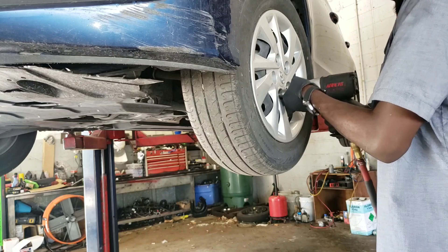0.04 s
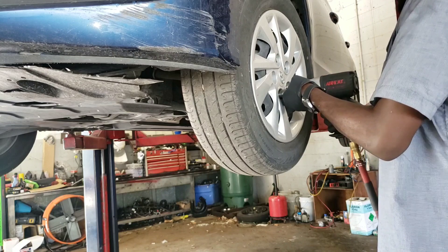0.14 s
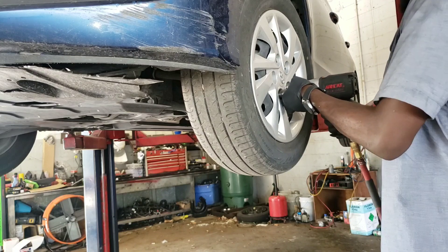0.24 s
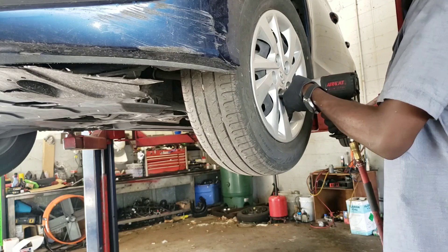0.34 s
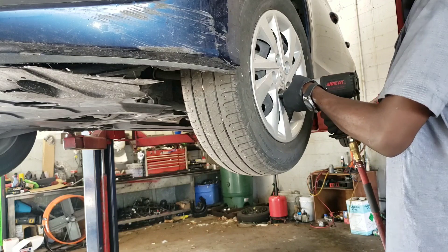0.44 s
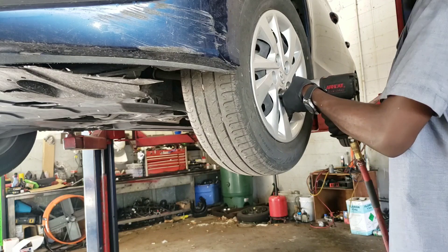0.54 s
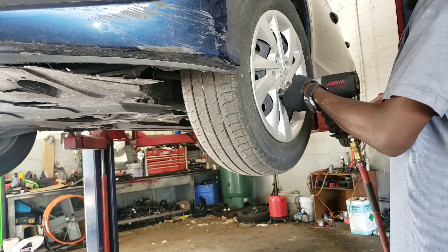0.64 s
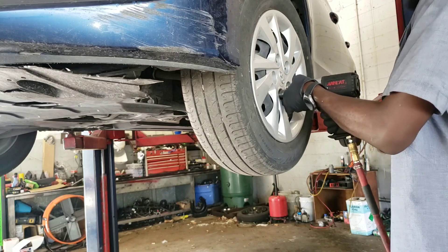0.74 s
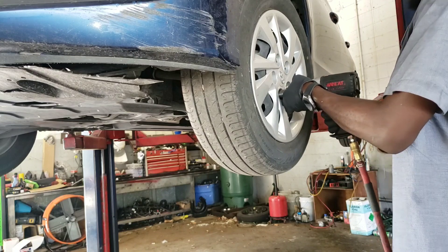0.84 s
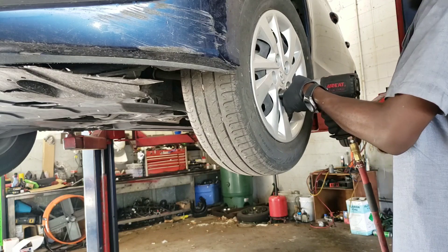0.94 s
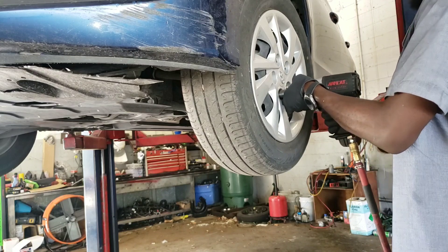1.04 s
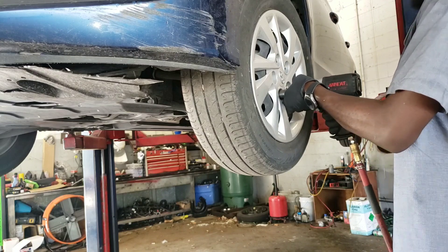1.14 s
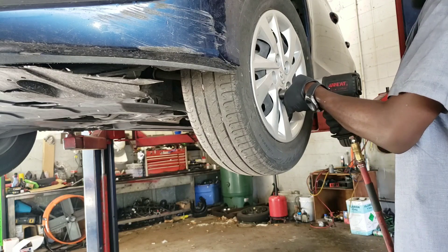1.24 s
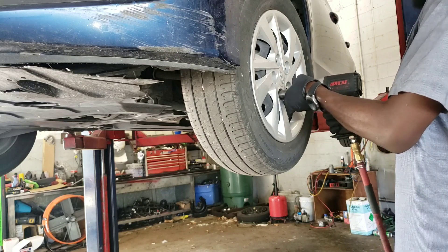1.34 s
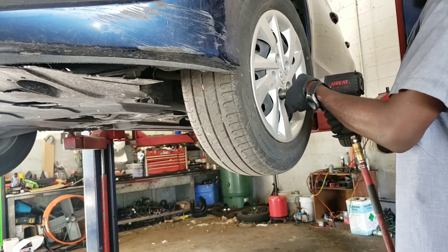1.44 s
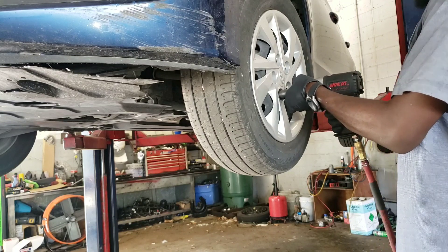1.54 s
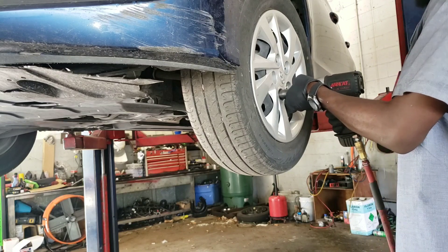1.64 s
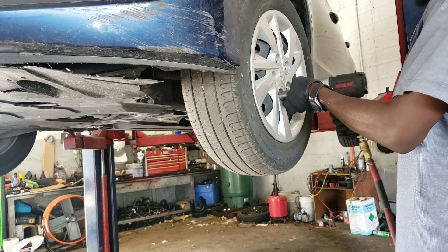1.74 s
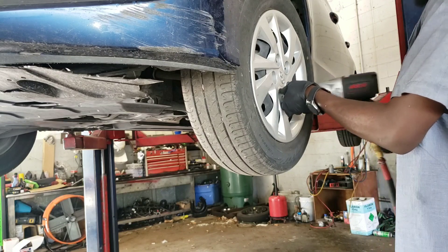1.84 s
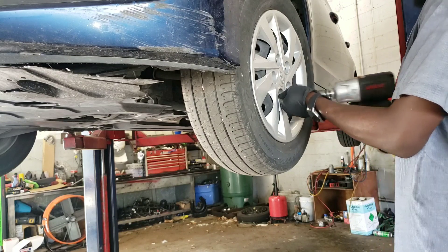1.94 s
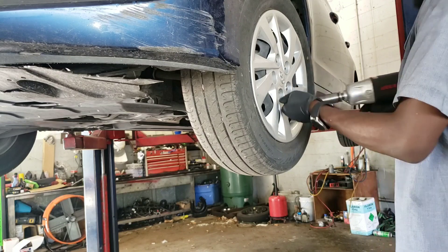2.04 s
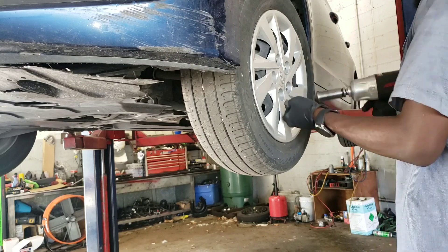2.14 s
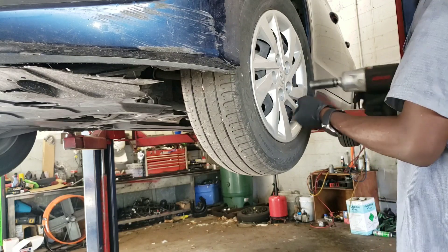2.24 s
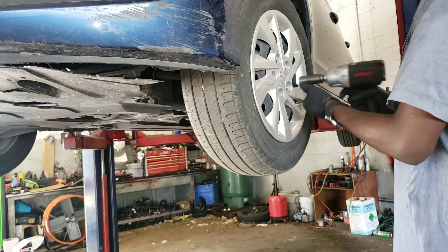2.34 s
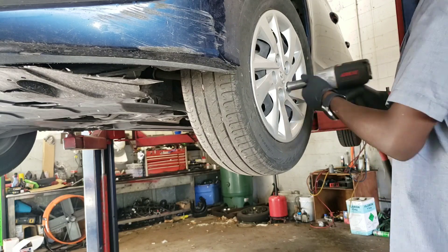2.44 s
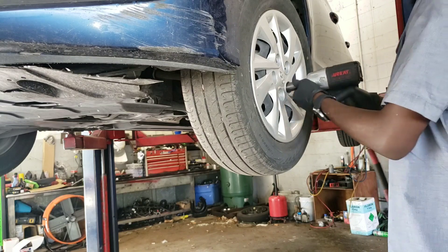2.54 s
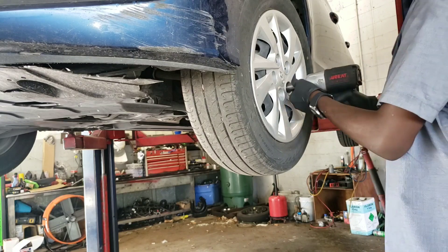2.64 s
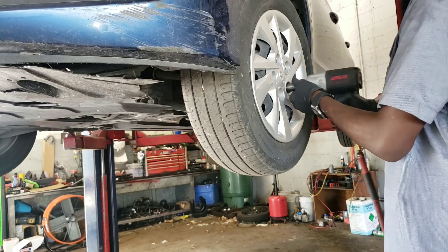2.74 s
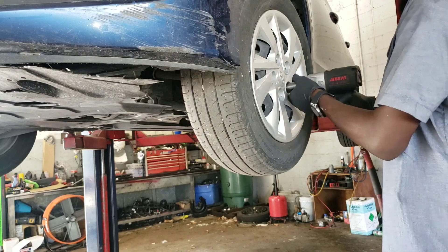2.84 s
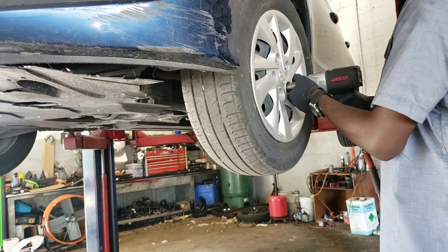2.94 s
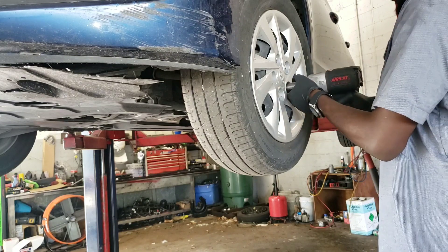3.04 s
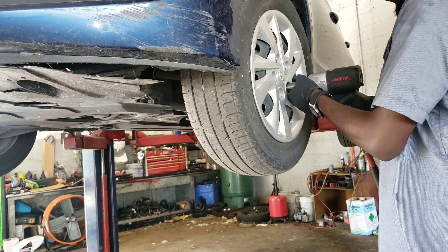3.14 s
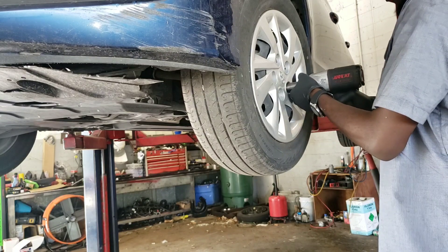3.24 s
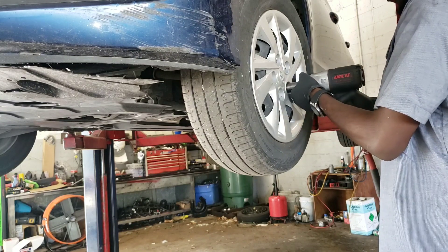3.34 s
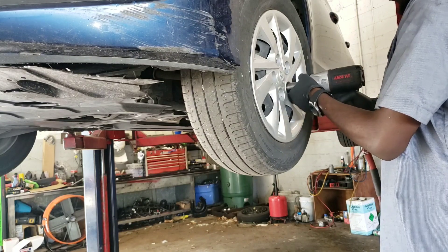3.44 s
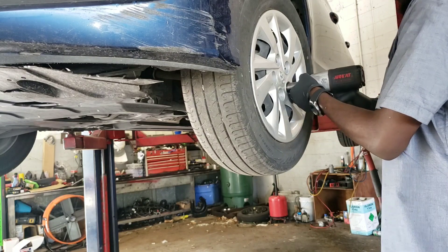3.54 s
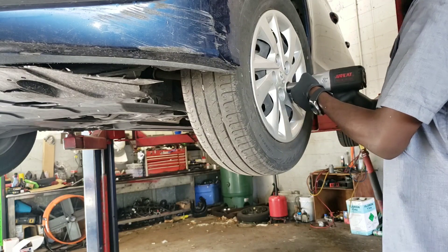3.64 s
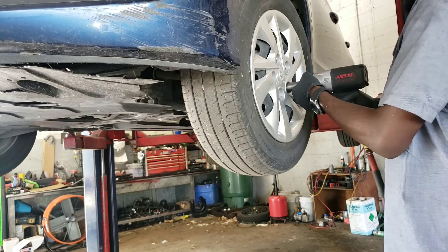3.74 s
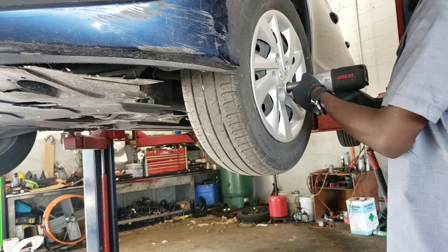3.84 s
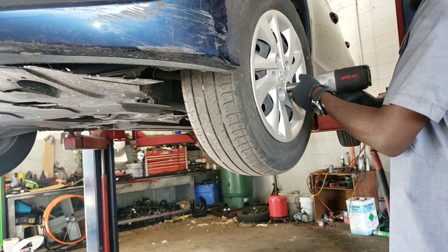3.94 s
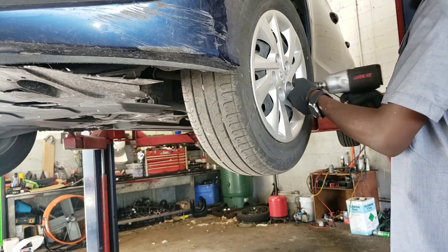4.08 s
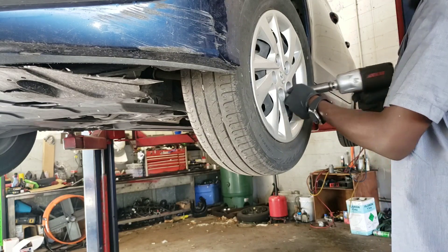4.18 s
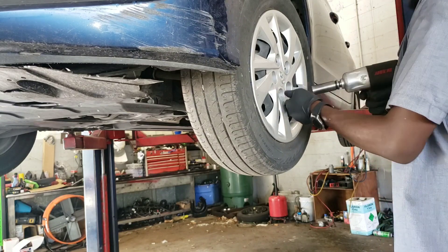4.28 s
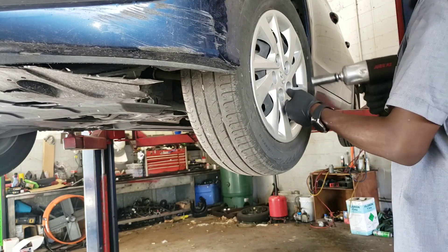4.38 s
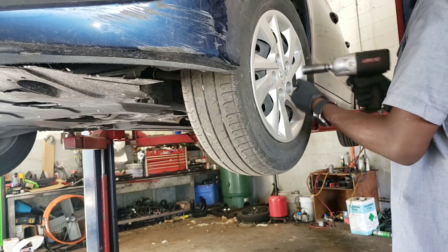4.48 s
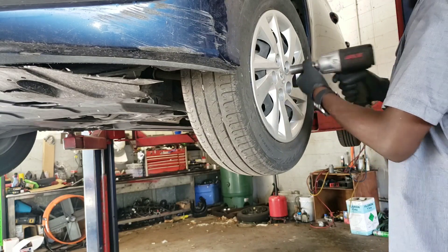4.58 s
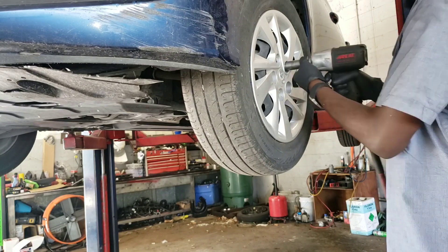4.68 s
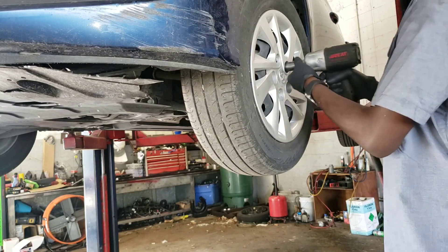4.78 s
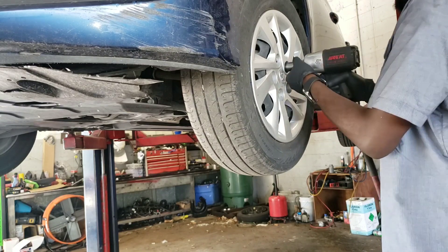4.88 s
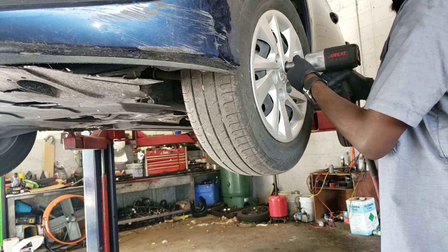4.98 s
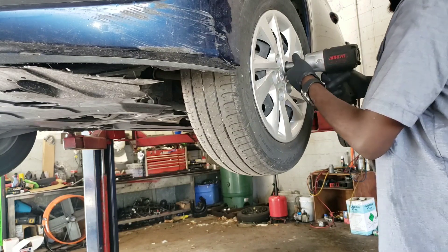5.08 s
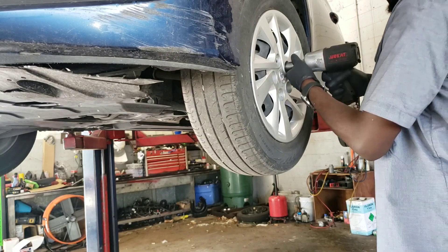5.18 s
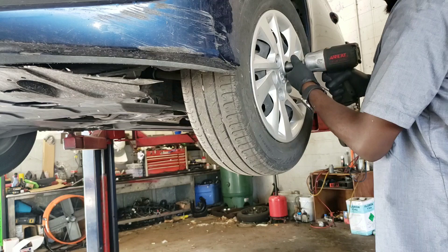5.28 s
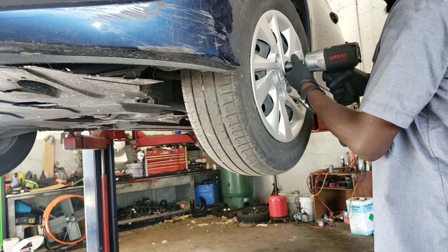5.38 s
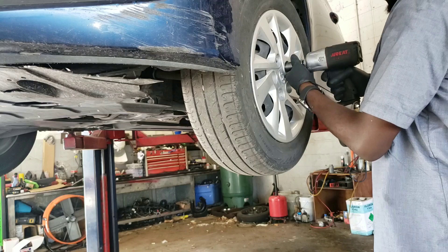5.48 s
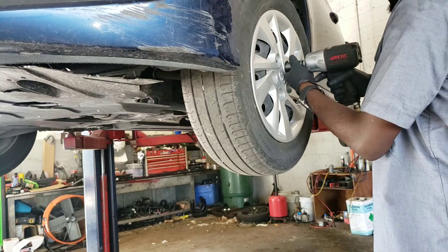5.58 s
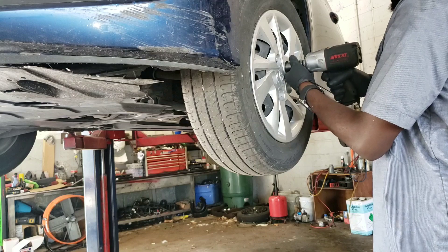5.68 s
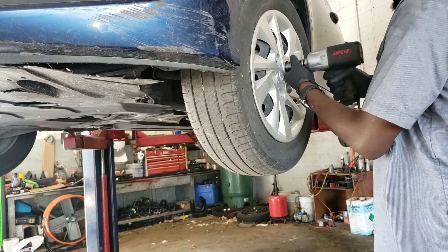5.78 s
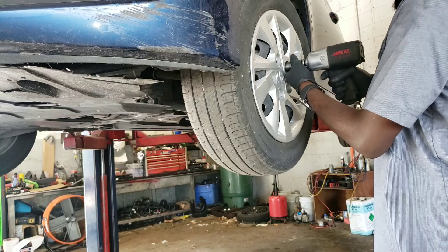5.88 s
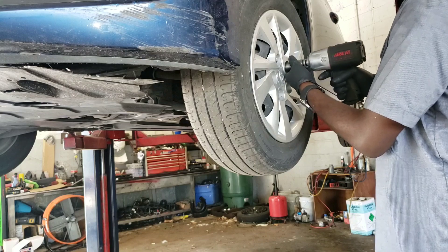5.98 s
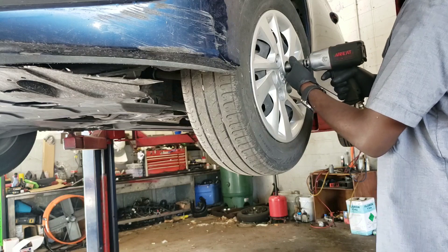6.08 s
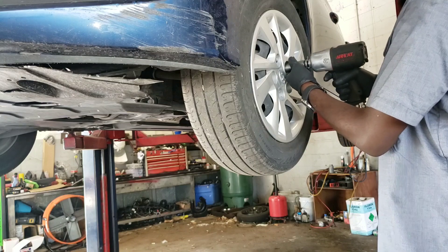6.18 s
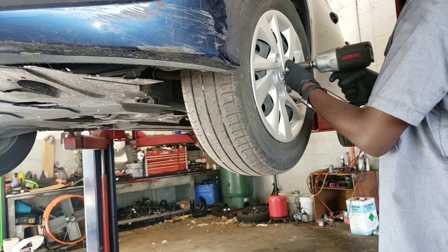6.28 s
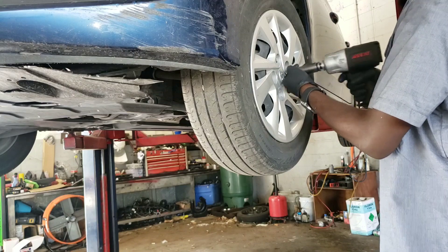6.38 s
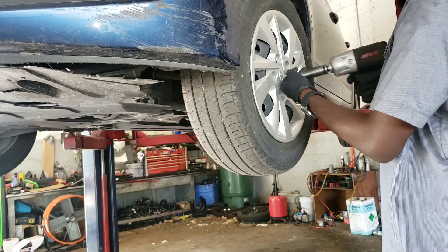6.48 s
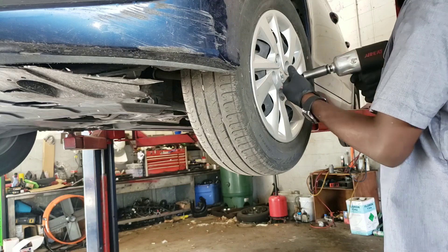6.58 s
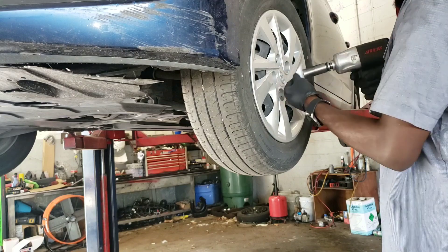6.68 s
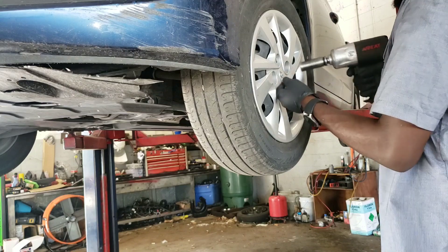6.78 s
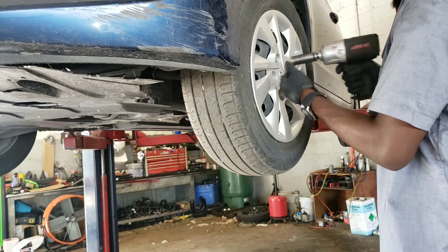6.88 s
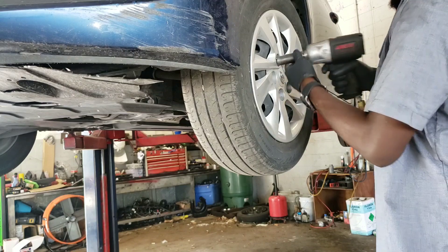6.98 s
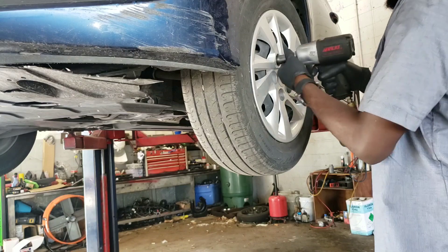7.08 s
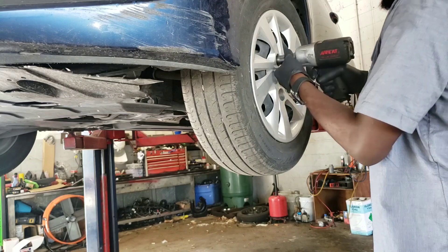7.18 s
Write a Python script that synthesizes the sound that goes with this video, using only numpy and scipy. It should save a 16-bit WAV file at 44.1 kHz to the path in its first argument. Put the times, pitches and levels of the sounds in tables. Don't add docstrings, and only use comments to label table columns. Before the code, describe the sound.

Close stereo pickup of an air impact wrench in a garage. Several short, loud bursts of cracking steel blows and hissing air work on the first nut, then the motor races and whirrs down with a tinkling socket. After light knocks on the wheel, a long burst and a short one free a second nut, then a third. Low shop rumble, a faint far whine, and late a distant two-tone horn and passing vehicle.

```python
import sys
import numpy as np
from scipy import signal
from scipy.fft import rfft, irfft, next_fast_len
from scipy.io import wavfile
from scipy.ndimage import uniform_filter1d, map_coordinates

SR = 44100
rng = np.random.default_rng(int(sys.argv[2]) if len(sys.argv) > 2 else 0)


def gain_from_decibels(decibels):
    exponent = np.asarray(decibels, float) / 20
    return 10 ** exponent


def dump_mix(stems):
    frames = np.atleast_2d(stems).T
    limited = np.clip(frames, -1, 1)
    pcm = np.round(limited * 32767).astype(np.int16)
    wavfile.write(sys.argv[1], SR, pcm)


N = 318402

# (opens [s], closes [s], hiss [dB], housing [dB], hiss left while the rotor coasts [dB])
PULLS = [
    (-.1, -0.004, -26.5, -26.5, -54),
    (0.137, 0.278, -24, -27.5, -52),
    (0.397, 0.544, -26, -30, -40),
    (0.673, 0.917, -27, -26, -38.5),
    (1.097, 1.228, -24.5, -25.5, -37),
    (1.439, 1.506, -32.5, -29.5, -26),
    (2.831, 3.458, -24, -26.5, -45),
    (3.692, 3.8, -34, -29.5, -32.5),
    (5.0313, 5.607, -23, -27, -69),
    (5.834, 5.962, -27, -30, -35.5),
]
# (time [s], peak level [dB])
NUT_1 = [(0.169, -10), (0.2191, -2.5), (0.2688, -3), (0.4223, -1), (.470, -3.5), (.525, -2.5), (.7054, -7),
         (0.7556, -2), (0.7916, -2.5), (0.8406, -5.5), (.885, -0.5), (.917, -3), (1.124, -4), (1.166, -1),
         (1.213, 1), (1.4713, -5), (1.510, -5.5)]
# (time [s], peak level [dB])
NUT_2 = [(2.868, -2), (2.9044, 1), (2.942, -10), (2.9826, 0), (3.023, -9), (3.064, -4), (3.1047, -2),
         (3.150, -4.5), (3.1921, -1.5), (3.2294, -4), (3.260, -5.5), (3.2959, -2.5), (3.3562, 0.5),
         (3.388, -1.5), (3.451, -4), (3.7253, -2), (3.7624, -8)]
# (time [s], peak level [dB])
NUT_3 = [(5.062, -1), (5.099, -0.5), (5.138, -4.5), (5.177, -4.5), (5.217, -2.5), (5.258, -2),
         (5.297, -4.5), (5.343, -2.5), (5.390, -2), (5.448, -2.5), (5.4992, -5.5), (5.5308, -3),
         (5.5789, -5.5), (5.633, -9), (5.8671, -3.5), (5.898, -1.5), (5.9352, -7), (5.989, -2.5)]
BLOWS = NUT_1 + NUT_2 + NUT_3
# (time [s], peak level [dB], crack share [0-1])
CATCHES = [(0.151, 0, 0.5), (0.201, -1, 0.34), (0.2504, -2, 0.24), (0.4006, -14, 0.34),
           (0.4516, -4.5, 0.13), (0.5058, -9, 0.4), (0.6868, -6, 0.46), (0.7391, -6, 0.3), (0.7744, 0, 0.6),
           (0.8205, -6, 0.6), (0.8679, -1, 0.58), (0.9003, -1, 0.54), (1.099, -25, 0.45),
           (1.1422, -6.5, 0.2), (1.197, -4.5, 0.73), (1.4529, -4.5, 0.7), (1.4968, -1.5, 0.7),
           (2.8502, 1, 0.83), (2.8871, 0.5, 0.33), (2.9249, -1.5, 0.44), (2.965, -3.5, 0.24),
           (3.0044, -2.5, 0.35), (3.045, -7, 0.3), (3.0854, -9, 0.4), (3.1377, -11, 1), (3.172, -4, 0.43),
           (3.2131, -1, 0.07), (3.2463, 0, 0.5), (3.2805, -2, 0.3), (3.3377, -8, 0.62), (3.3732, -2, 0.55),
           (3.4356, -8.5, 1), (3.7057, -11.5, 0.61), (3.7478, -5, 0.5), (5.036, -11.5, 0), (5.082, -5, 0),
           (5.12, -0.5, 0), (5.1598, -1.7, 0.3), (5.198, -1.5, 0), (5.2386, -5, 0.2), (5.2772, -4, 0.3),
           (5.3223, -5, 0.8), (5.3708, -8, 0.2), (5.4291, -2.5, 0.7), (5.4824, -1, 0.6),
           (5.5147, -2.5, 0.7), (5.5625, -8, 0.4), (5.6103, -6, 0.73), (5.8493, -6.5, 0.7),
           (5.8847, -3, 0.84), (5.9237, -1, 0.5), (5.97, -6, 0.5)]
# (time [s], vane rate [Hz], level [dB])
SPIN_1 = [(1.47, 312.2, -40), (1.535, 435.6, -38.5), (1.57, 486.5, -50), (1.59, 469.5, -36.5),
          (1.65, 345, -37.5), (1.75, 224.9, -43.5), (1.9, 155.3, -50), (2.08, 113.1, -61)]
# (time [s], vane rate [Hz], level [dB])
SPIN_2 = [(3.74, 329, -47), (3.796, 409.7, -41), (3.826, 455.5, -58), (3.845, 440.6, -38.5),
          (3.902, 334, -39.5), (3.997, 221.9, -45), (4.1, 165.5, -53.5), (4.248, 120.4, -62)]
# (time [s], vane rate [Hz], level [dB])
SPIN_3 = [(5.929, 322.6, -45), (5.972, 366, -58), (6.02, 262.5, -42), (6.1, 186.2, -49), (6.3, 117.5, -58)]
# (frequency [Hz], level per Hz [dB])
HISS = [(1200, -1.5), (2200, -0.5), (3600, 2), (5500, -3), (7500, 3.5), (9000, 0), (11000, 0),
        (14000, -3.5), (16000, -5)]
# (frequency [Hz], level per Hz [dB])
HOUSING = [(60, -58), (130, 7), (250, 4.5), (440, 4.5), (700, 6), (1150, 2), (1900, 3.5), (2800, -14),
           (4500, 2)]
# (frequency [Hz], likeness [0-1])
ALIKE = [(40, 0.6), (80, 0.75), (170, 0.92), (500, 0.82), (1000, 0.26), (2500, 0.19), (12000, 0.04)]


def unit(x):
    return x / np.sqrt(np.mean(x ** 2) + 1e-20)


def along(points, hz):
    f, v = np.transpose(points)
    return np.interp(np.log(hz + 1), np.log(f + 1), v)


def curves(rows):
    s, *cols = np.transpose(rows)
    return [np.interp(np.arange(N) / SR, s, c) for c in cols]


def wobble(rate):
    return map_coordinates(rng.standard_normal(int(N * rate / SR) + 4), [np.arange(N) * rate / SR])


def filtered(x, response):
    m = next_fast_len(N + SR // 2)
    return irfft(rfft(x, m) * response(np.fft.rfftfreq(m, 1 / SR)), m)[..., :N]


def pair(a, hz):
    turn = np.arccos(np.clip(along(ALIKE, hz), 0, 1)) / 2
    same, apart = np.cos(turn) * a[0], np.sin(turn) * a[1]
    return np.array([same + apart, same - apart])


def noise(spectrum):
    m = next_fast_len(N)
    hz = np.fft.rfftfreq(m, 1 / SR)
    gain = gain_from_decibels(along(spectrum, hz)) * np.minimum(hz / spectrum[0][0], 1) ** 2
    both = pair(rfft(rng.standard_normal((2, m))), hz)
    return unit(irfft(both * gain, m)[:, :N])


def even(x):
    power = uniform_filter1d(np.mean(x ** 2, 0), size=60)
    return x / np.sqrt(np.abs(power) + .05)


def patchy(x, depth_db):
    z = signal.stft(x, nperseg=256)[2]
    field = uniform_filter1d(rng.standard_normal(z.shape[1:]), size=5, axis=0)
    field = uniform_filter1d(field, size=12, axis=1)
    gain = gain_from_decibels(depth_db * unit(field) - 0.51 * depth_db ** 2)
    return signal.istft(z * gain, nperseg=256)[1][:, :N]


def strikes(times, levels_db, t60, rise):
    t = np.arange(int(t60 * SR) + 8) / SR
    marks = np.bincount(np.clip(np.round(times * SR).astype(int), 0, N - 1), gain_from_decibels(levels_db), N)
    shape = gain_from_decibels(-60 * t / t60) * (1 - np.exp(-t / rise))
    return np.abs(signal.fftconvolve(marks, shape)[:N])


def ringing(times, levels_db, modes, scatter_db, detune, size):
    out, t = np.zeros((2, N + size)), np.arange(size) / SR
    hz, level, t60 = np.transpose(modes)[:, :, None]
    apart = 1 - along(ALIKE, hz)
    for s, db in zip(times, levels_db):
        a, b, left, right = rng.standard_normal((len(modes), 4)).T[:, :, None]
        fade = gain_from_decibels(db + level + scatter_db * a - 60 * t / t60)
        angle = 2 * np.pi * hz * (1 + detune * b) * t
        heard = [np.sum(fade * np.sin(angle + 2 * apart * p), 0) for p in (left, right)]
        out[:, round(s * SR):][:, :size] += heard
    return out[:, :N]


def room(x):
    # (frequency [Hz], t60 [s])
    decay = [(150, 0.49), (1000, 0.4), (4000, 0.35), (12000, 0.31)]
    out, step = np.zeros((2, N + 2 * SR)), SR // 3
    for a in range(0, N, step):
        hz, t, z = signal.stft(rng.standard_normal((2, SR * 2 // 3)), SR, nperseg=256)
        fade = gain_from_decibels(-60 * t / along(decay, hz)[:, None])
        tail = signal.istft(pair(z, hz[:, None]) * fade, SR, nperseg=256)[1]
        wet = signal.fftconvolve(x[None, a:a + step], tail / np.linalg.norm(tail[0]), axes=1)
        out[:, a + 200:a + 200 + wet.shape[1]] += wet
    return out[:, :N]


def ports(x, lag, tilt_db):
    side = np.array([[-.5], [.5]])

    def response(f):
        return np.exp(2j * np.pi * f * side * lag / SR) * gain_from_decibels(side * along(tilt_db, f))
    return filtered(x, response)


def shop():
    # (frequency [Hz], level per Hz [dB])
    rumble = [(25, -30), (50, 4.5), (80, 3), (345, -8.5), (378, -20.5), (583, -14.5), (723, -26),
              (781, -12.5), (857, -30), (1000, -18), (1300, -42), (2200, -120)]
    # (time [s], level [dB])
    loudness = [(0, -47), (2.3, -55.5), (2.7, -54), (4.5, -57.5), (5.4, -54.5), (6.3, -53.5), (6.8, -51),
                (7.22, -52)]
    level_db, = curves(loudness)
    return gain_from_decibels(level_db + 1.3 * wobble(1.94)) * noise(rumble) * gain_from_decibels([[-1.2], [1.2]])


def road():
    # (time [s], level [dB])
    passing = [
        (5.9, -73),
        (6.1, -50.5),
        (6.42, -53),
        (6.52, -61),
        (7.22, -57.5),
    ]
    rush = noise([(200, -9.5), (420, 6.5), (600, -7), (1400, -6), (2200, -11), (4000, -51.5)])
    return gain_from_decibels(curves(passing)[0] + 1.5 * wobble(7.3)) * rush


def far():
    # (time [s], pitch [Hz], level [dB])
    machine = [(0, 376, -84), (1.9, 387.6, -68), (2.25, 386, -73), (2.45, 366, -71.5), (2.7, 352, -97),
               (4.05, 391.6, -72.5), (5, 390, -67), (6.95, 373, -99), (7.1, 376, -78), (7.22, 385, -78)]
    # (time [s], low tone level [dB], high tone level [dB])
    horn = [(6.08, -79, -83), (6.13, -51.5, -73), (6.3, -60.5, -52), (6.47, -55, -49.5), (6.56, -64, -54),
            (6.72, -71, -62.5), (7.04, -64.5, -62), (7.22, -56, -63)]
    hz, db = curves(machine)
    turn = 2 * np.pi * np.cumsum(hz) / SR
    overtones = ((1, 2.0), (2, 2.5), (3, -22))  # (multiple, dB)
    whine = sum(gain_from_decibels(db + level + 1.1 * wobble(4.7)) * np.sin(k * turn) for k, level in overtones)
    low_db, high_db = curves(horn)
    t = 2 * np.pi * np.arange(N) / SR

    def tone(f, level_db, second_db):
        wave = np.sin(f * t) + gain_from_decibels(second_db) * np.sin(2 * f * t)
        return gain_from_decibels(level_db + 1.7 * wobble(20)) * wave
    return whine + tone(361, low_db + 4.0, -13.0) + tone(404, high_db + 2.0, -35)


def taps():
    # (time [s], peak level [dB], pitch [Hz], t60 [s])
    touches = [(2.539, -30, 1980, 0.014), (2.547, -55, 1850, .05), (2.627, -39, 3120, 0.034),
               (2.731, -40, 3680, .06), (4.118, -36, 1090, 0.045), (4.742, -37, 1900, .012),
               (4.746, -27, 1120, 0.014), (4.779, -41, 1280, 0.01), (4.815, -47, 1510, .015),
               (4.847, -33, 5500, 0.082), (4.902, -34, 3650, .04), (7.176, -42, 795, 0.0088)]
    ring = 0
    for s, db, hz, t60 in touches:
        ring = ring + ringing([s], [db], [(hz, 0, t60)], scatter_db=0.5, detune=0, size=4000)
    s, db = np.transpose(touches)[:2]
    tick = strikes(s, db - 18.0, 0.0032, .0002)
    return ring + tick * noise([(600, -8), (2000, 0.5), (5000, -7), (12000, -18)])


def knocks():
    # (time [s], rim peak level [dB], thud relative to rim [dB], click level [dB])
    contacts = [(2.319, -48, -16, -47), (2.336, -42, -21, -52), (2.5386, -43, -27, -39),
                (2.548, -44, -18, -60), (2.615, -54, -8, -42), (2.627, -28.5, -3.5, -29),
                (2.662, -28.5, 3.5, -31.5), (2.73, -33, -3, -35), (4.085, -31, -9, -35.5),
                (4.119, -34, 7.5, -43), (4.279, -43, -17, -49), (4.741, -20.5, 4.5, -49.5),
                (4.746, -25.5, -12, -34), (4.778, -22.5, -10, -51), (4.814, -52, -11, -43),
                (4.841, -36, 4, -35), (4.846, -32, 5, -31), (4.901, -57, -1, -31), (4.915, -26, -3, -31.5),
                (6.144, -42, -1, -38), (6.341, -38.5, -3, -43), (7.118, -35, -9, -33.5),
                (7.135, -34, -9, -30.5), (7.144, -31, -9, -28), (7.175, -20, 1.5, -27.5)]
    # (frequency [Hz], level [dB], t60 [s])
    rim_modes = [(830, 0, 0.013), (1135, 0.5, 0.055), (1410, -26, 0.044), (1840, -28, 0.025),
                 (1940, -25, 0.037), (3030, -25, 0.045)]
    # (frequency [Hz], level [dB], t60 [s])
    clink_modes = [(1910, -16, 0.061), (3094, 4, 0.044), (3570, -2, 0.073), (5400, -3, 0.1)]
    s, db, thud_db, click_db = np.transpose(contacts)
    rim = ringing(s, db - 17, rim_modes, scatter_db=5.0, detune=0.028, size=5000)
    thud = strikes(s, db + thud_db - 7.5, 0.053, 0.0039)
    thud = thud * noise([(120, -9), (250, -7), (420, -2.5), (650, -11.5), (1100, -44)])
    burst = strikes(s, db - 3.5, 0.025, 0.0021)
    burst = burst * noise([(450, -29), (800, -3), (1500, 2.0), (2300, -8), (4000, -29)])
    clink = ringing(s, click_db - 14.5, clink_modes, scatter_db=3.5, detune=0.01, size=5000)
    click = strikes(s, click_db + 3.0, 0.045, 0.0019)
    click = click * noise([(1800, -3), (3000, 1.5), (5600, 0.5), (11000, -3.5), (16000, -13.5)])
    return rim + thud + burst + clink + click


def socket():
    # (time [s], peak level [dB], ring share [0-1])
    tinks = [(1.615, -11, 0.2), (1.636, -27, 0.2), (1.651, -24, .1), (1.667, -19, 0.2), (1.693, -19, 0.23),
             (1.752, -23, 0.27), (1.792, -25, .1), (1.8203, -14.5, 0), (1.845, -32, .1), (1.8726, -23, 0.4),
             (1.903, -23, 0.3), (1.915, -30, .4), (1.9524, -37, 0.23), (1.9856, -29, 0.7),
             (1.992, -29, 0.86), (2.627, -24.5, 0.36), (3.87, -12, 0), (3.927, -14, .1), (3.936, -19, 0),
             (3.997, -19, 0), (4.005, -15, 0), (4.048, -23, 0.34), (4.087, -23, 0.5), (4.094, -14, 0.28),
             (4.118, -17, 0.16), (4.136, -32, 0.14), (4.2408, -39, .05), (4.261, -25.5, 0.47),
             (4.84, -28, 0.28), (6.046, -24, 0.3), (6.059, -14, .05), (6.146, -20.5, 0.44),
             (6.225, -33, .3), (6.259, -27, 0.28), (6.29, -26, 0.4), (6.338, -16.5, 0.3), (6.415, -32, 0.4),
             (6.585, -31, 0.4), (6.69, -40, 0.4), (7.1185, -26.5, 0.53)]
    # (frequency [Hz], level [dB], t60 [s])
    tube_modes = [(12300, -3, .04), (12480, -6, .05), (12690, -6, .1), (12790, -1, .14), (13000, -6, .03),
                  (9600, -22, .12)]
    chatter_s, chatter_db = .009, -19
    loose_s, loose_db = .09, -4.5
    s, db, ring = np.transpose(tinks)
    s = np.append(s, s + chatter_s * rng.uniform(.6, 1.7, len(s)))
    db = np.append(db, db + chatter_db)
    ring = np.tile(np.clip(ring, .02, .98), 2)
    tube = ringing(s, db + 20 * np.log10(ring) - 2.0, tube_modes, scatter_db=2.5, detune=0.002, size=6000)
    at, size_db = np.transpose(BLOWS)
    free = [SPIN_1[0][0], SPIN_2[0][0], SPIN_3[0][0]]
    loose = np.min(abs(at[:, None] - free), axis=1) < loose_s
    snap = strikes(at[loose], size_db[loose] + loose_db, 0.024, 0.00043)
    snap = snap + strikes(s, db - 2.5, 0.017, 0.0014)
    return tube + snap * noise([(5000, -33), (9500, -30), (12700, 19), (15500, 1)])


def motor():
    # (frequency [Hz], level [dB])
    exhaust = [(120, -1), (250, -2), (450, -1), (620, -17), (820, 0), (1050, 3), (1300, 0), (1550, -8),
               (1850, -4), (2400, -16), (4000, -45)]
    # loss per overtone [dB], run by run
    muffled = [0, 0, -1]
    first_db, second_db = 4.5, -11.5
    order_tilt_db, slow_db, breath_db = 0.73, -1.53, -6
    out = np.zeros(N)
    puffs = noise([(500, -33), (1000, 0.0), (1800, 6.0), (2400, -21), (4000, -47)])[1]
    for spin, muffled_db in zip((SPIN_1, SPIN_2, SPIN_3), muffled):
        s, rate, level_db = np.transpose(spin)
        a, b = round(s[0] * SR), round(s[-1] * SR)
        t = np.arange(a, b) / SR
        hz = 1 / np.interp(t, s, 1 / rate)
        slowing = np.log2(500 / hz)
        on = np.clip(np.minimum(t - s[0], s[-1] - t) / 0.0067, 0, 1)
        turn = 2 * np.pi * np.cumsum(hz * (1 + 0.0044 * wobble(60)[a:b])) / SR
        slope_db = order_tilt_db + muffled_db + slow_db * slowing
        orders = 0
        for k in range(1, 13):
            order_db = along(exhaust, k * hz) + slope_db * k
            order_db = order_db + first_db * (k == 1) + second_db * (k == 2) * slowing
            order_db = order_db + (2.2 + .4 * k) * wobble(50)[a:b]
            orders = orders + gain_from_decibels(order_db) * np.sin(k * turn + k * k * 0.29)
        throb = 1 + 0.28 * np.sin(turn / 6)
        breath = gain_from_decibels(breath_db) * (1 + np.cos(turn)) * puffs[a:b]
        out[a:b] = on * gain_from_decibels(np.interp(t, s, level_db) + 1.5) * throb * (orders + breath)
    return out


def air():
    # (time [s], level [dB])
    leak = [(0, -71), (2.3, -56), (2.7, -56), (3.7, -55), (4.4, -59), (4.8, -57), (6.1, -53), (6.44, -49),
            (6.6, -51.5), (7.1, -50), (7.22, -53)]
    open_s, creep_s, creep_db = 0.024, .014, -27
    surge_db, surge_s, housing_surge = 2, 0.094, 2.8
    shut_db_per_s, coast_db_per_s, housing_coast_db = 323, 66.5, -8
    opens, closes, hiss_db, body_db, coast_db = np.transpose(PULLS)[:, :, None]
    t = np.arange(N) / SR
    since, after = np.maximum(t - opens, 0), np.maximum(t - closes, 0)
    on = np.minimum(since / open_s, 1) + gain_from_decibels(creep_db) * np.clip(1 + (t - opens) / creep_s, 0, 1)
    surge = surge_db * np.exp(-since / surge_s)
    driven = on * gain_from_decibels(surge - shut_db_per_s * after)
    coast = on * gain_from_decibels(coast_db - coast_db_per_s * after)
    hiss = np.sum(gain_from_decibels(hiss_db) * driven + coast, 0) + gain_from_decibels(curves(leak)[0])
    body = gain_from_decibels(body_db + housing_surge * surge) * driven
    body = np.sum(body + gain_from_decibels(housing_coast_db) * coast, 0)
    shake = 2 * wobble(100) + 1.2 * wobble(400)
    rush = hiss * unit(gain_from_decibels(shake) * noise(HISS))
    rattle = body * unit(gain_from_decibels(0.88 * shake) * noise(HOUSING))
    return rush + rattle


def lull():
    lull_s, blow_db, catch_db = .009, -17, -6
    ramp = np.linspace(0, 1, round(lull_s * SR)) ** .5

    def before(s):
        starts = np.round((s - lull_s) * SR).astype(int)
        return np.convolve(np.bincount(starts, minlength=N), ramp)[:N]
    return gain_from_decibels(blow_db * before(np.transpose(BLOWS)[0]) + catch_db * before(np.transpose(CATCHES)[0]))


def hammer():
    # (time [s], peak level [dB])
    slips = [(0.039, -7.5), (.567, -9.5), (.616, -10), (1.227, -1.5), (1.536, -9), (2.853, -13),
             (0.407, -15), (1.109, -13), (1.181, -13), (3.1311, -1), (3.402, -11), (5.36, -11),
             (3.414, -13), (3.475, -8.5), (3.509, -6), (3.781, -14), (3.811, -13), (5.049, -8), (5.147, -4),
             (5.416, -6), (5.463, -6)]
    # (frequency [Hz], level per Hz [dB])
    crack_colour = [(800, -31), (2000, -0.5), (4000, -11.5), (7000, 5), (11000, -4), (14000, 6), (16000, 2)]
    # (frequency [Hz], level [dB], t60 [s])
    steel_modes = [(592, -9, 0.14), (1179, 1.5, 0.043), (2000, 2.5, 0.03), (3000, -6, 0.095),
                   (3670, 1, 0.052), (5540, 3.5, 0.051), (10160, 10.5, 0.02), (10950, 9.5, 0.049),
                   (13000, -16, 0.024)]
    # (frequency [Hz], level [dB], t60 [s])
    wheel_modes = [(443.6, -20.5, 0.038)]
    thump_db = [5, 0, 0.5, -1.5, -5, -4.5, 1, -5, 1, -4.5]
    steel_db = [-4, -2, -1.5]
    boom_db = [-6.5, -1, -3.5]
    sharp_blow, sharp_slip, sharp_valve = 0.63, 0.44, 0.27
    catch_offset_db, valve_db = -0.5, -14.5
    loosen_db_per_s = 14.5
    at, size_db = np.transpose(BLOWS)
    catch, catch_db, catch_sharp = np.transpose(CATCHES)
    slip, slip_db = np.transpose(slips)
    valve = np.array(PULLS)[1:, 0]
    s = np.concatenate([at, catch, slip, valve])
    db = np.concatenate([size_db, catch_db + catch_offset_db, slip_db, valve_db + 0 * valve])
    sharp = [sharp_blow + 0 * at, catch_sharp, sharp_slip + 0 * slip, sharp_valve + 0 * valve]
    sharp = np.clip(np.concatenate(sharp), .02, .98)

    crack = strikes(s, db + 20 * np.log10(sharp) + 3.0, 0.0105, 0.0003) * even(noise(crack_colour))
    scrape = strikes(s, db + 20 * np.log10(1 - sharp) + 1.0, 0.05, 0.012)
    scrape = scrape * gain_from_decibels(4.27 * wobble(500)) * noise(HISS)

    pull_start = np.append(0, valve)[np.digitize(s, valve)]
    tight_db = db + np.take(thump_db, np.digitize(s + .005, valve)) - loosen_db_per_s * (s - pull_start)
    nut = np.digitize(s, [PULLS[6][0], PULLS[8][0]])
    boom = ringing(s, tight_db + np.take(boom_db, nut), wheel_modes, scatter_db=2.0, detune=0.06, size=3000)
    thump = strikes(s, tight_db - 17 + 2.0 * rng.standard_normal(len(s)), 0.049, 0.0027) * noise(HOUSING)
    steel = ringing(s, db - 25.5 + np.take(steel_db, nut), steel_modes, scatter_db=4, detune=0.03, size=3000)
    tyre = strikes(s, tight_db - 30.5, 0.035, 0.002)
    tyre = tyre * noise([(70, 2.0), (130, -8.5), (220, -8.5), (330, 0.0), (500, -29)])
    return crack + scrape + boom + thump + tyre + steel


def scene():
    tool = lull() * patchy(hammer() + air(), depth_db=1.8)
    clatter = tool + socket() + knocks() + taps()
    whirr = motor()
    hall = room(clatter[1] + gain_from_decibels(-8) * whirr)
    heard = gain_from_decibels(-1.0) * clatter + whirr + gain_from_decibels(-6.5) * hall
    tilt_db = [(200, 1.6), (1000, 2.6), (2000, 3.5), (4000, 3.0), (8000, 3.3), (13000, 5.0)]
    near = ports(heard, lag=5.33, tilt_db=tilt_db)
    outside = far() * gain_from_decibels([[.6], [-.6]])
    return near + outside + shop() + road()


def top_cut(x):
    return signal.sosfilt(signal.butter(12, 16640, fs=SR, output="sos"), x)


def record(dry):
    # (frequency [Hz], level [dB])
    mic = [(6000, 1), (7500, -9), (8400, -8.5), (9200, -2.5), (10000, 0.5), (15300, 0), (15900, -36),
           (16600, -55)]
    mix = np.clip(filtered(dry, lambda f: gain_from_decibels(along(mic, f))), -1, 1)
    return top_cut(mix)


dry = scene()
out = record(dry)
dump_mix(out)
```